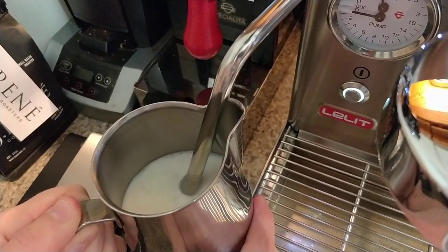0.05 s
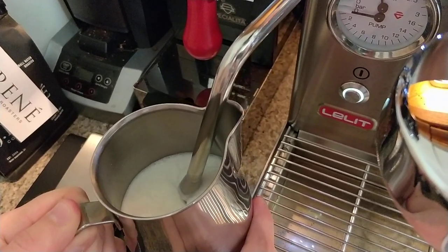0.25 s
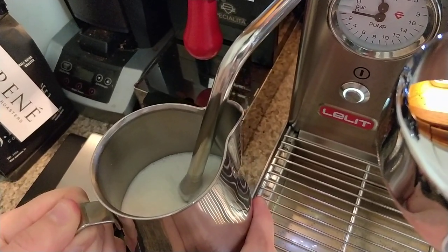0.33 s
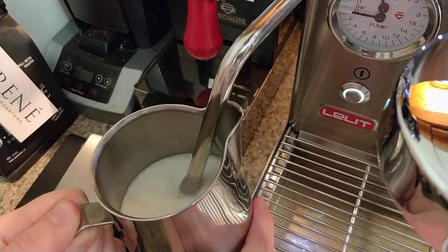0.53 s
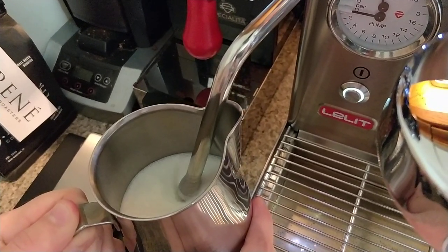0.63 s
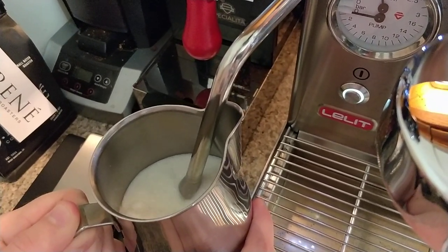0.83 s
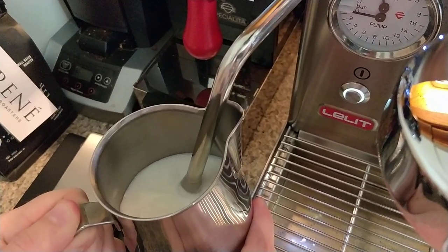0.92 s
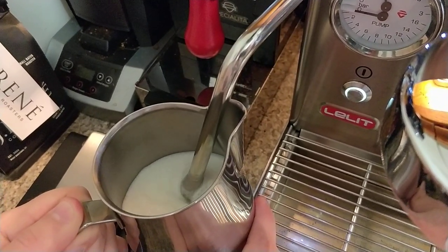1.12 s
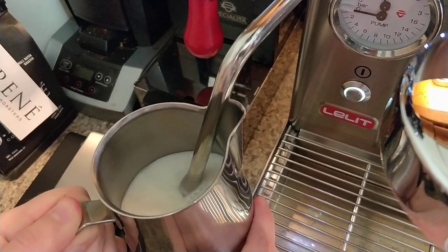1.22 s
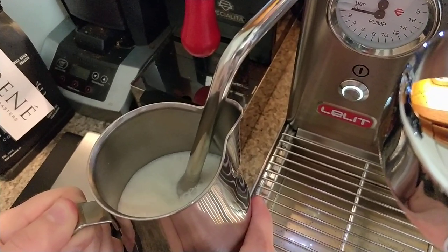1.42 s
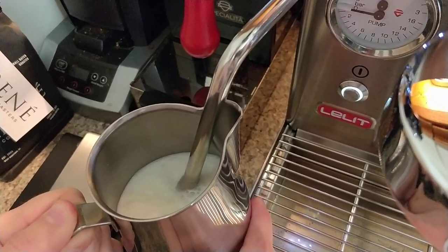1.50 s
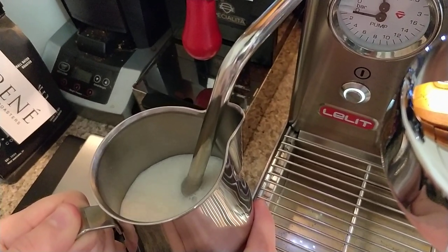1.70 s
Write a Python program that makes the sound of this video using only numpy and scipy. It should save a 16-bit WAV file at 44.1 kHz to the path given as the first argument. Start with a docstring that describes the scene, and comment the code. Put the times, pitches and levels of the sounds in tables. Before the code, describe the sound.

A steam wand froths milk in a metal pitcher, heard up close in a kitchen. It fizzes and churns, tearing in gulps of air with shrill chirps, then bubbles and gurgles more, over a faint machine hum.

```python
"""Steam wand frothing milk

In a steel pitcher on a kitchen counter, the buried jet fizzes and churns as steam bubbles collapse.
When the tip breaks the surface it tears in a gulp of air, often with a shrill chirp. Jet and gulps
ring in the pitcher's air column; bubbles plop, the milk gurgles and the machine hums underneath."""
import sys
import numpy as np
from scipy import signal
from scipy.fft import rfft, irfft
from scipy.io import wavfile
from scipy.ndimage import uniform_filter1d

SR = 44100
rng = np.random.default_rng(int(sys.argv[2]) if len(sys.argv) > 2 else 0)


def wav_record(signal):
    """Record a signal, one row per channel, as 16-bit PCM in the file named by sys.argv[1]."""
    frames = np.transpose(np.atleast_2d(signal))
    bounded = np.clip(frames, -1, 1)
    # unit amplitude maps onto the largest positive 16-bit level
    quanta = np.round(bounded * 32767).astype(np.int16)
    wavfile.write(sys.argv[1], SR, quanta)


N = 77175
T = np.arange(N) / SR


def from_db(db):
    """Decibels to gain."""
    return 10 ** (np.asarray(db) / 20)


def rms(x):
    """Root mean square."""
    return np.sqrt(np.mean(x ** 2) + 1e-20)


def colour(x, outline):
    """Shape a spectrum by an (Hz, dB) outline; rms 1."""
    hz, db = np.transpose(outline)
    bin_hz = np.maximum(np.arange(N // 2 + 1) * SR / N, 1)
    y = irfft(rfft(x) * from_db(np.interp(np.log(bin_hz), np.log(hz), db)), N)
    return y / rms(y)


def low_pass(x, hz):
    """Second-order low-pass."""
    return signal.sosfilt(signal.butter(2, hz, fs=SR, output="sos"), x + 1e-18)


def drift(hz):
    """Smooth random wander; rms 1."""
    y = low_pass(rng.standard_normal(2 * N), hz)[N:]
    return y / rms(y)


def grains(per_s, spread_db):
    """Random clicks of uneven size."""
    sizes = from_db(spread_db * np.minimum(rng.exponential(1, N), 4))
    return sizes * rng.choice([-1, 1], N) * (rng.random(N) < per_s / SR)


def envelope(start_s, length_s, attack_s, release_s):
    """Linear attack; exponential release once the length is over."""
    rise = np.clip((T - start_s) / attack_s, 0, 1)
    return rise * np.exp(-np.maximum(T - start_s - length_s, 0) / release_s)


def steady(x, window_s=0.0091):
    """Even out the chance swells of a noise; rms about 1."""
    return x / np.sqrt(uniform_filter1d(x * x, size=int(window_s * SR)) + 1e-12)


# Air resonances. Each row: frequency in Hz, width in Hz, gain in dB.
AIR_MODES = [(256.6, 218, -17), (576, 132, -20.5), (994.3, 96.3, -6.5), (1229, 178, -20.5),
             (1767, 28, -29.5), (2360, 73, -25.5), (2382, 62, -16), (2817, 111, -12.5), (3023, 110, -15.5),
             (3383, 121, -12.5), (3682, 97, -9.5), (4245, 83, -4.5), (4367, 67, -1), (4701, 134, -1),
             (4765, 63, 4), (5047, 210, -5), (5324, 160, -2), (5479, 147, 5), (5850, 153, -17),
             (6230, 114, -18.5), (6940, 167, -7), (6953, 76, -7.5), (7286, 81, -5), (7680, 130, -12.5),
             (7976, 420, -23.5)]
# Cancellations at the pitcher's mouth. Each row: frequency in Hz, width in Hz.
MOUTH_NULLS = [(388, 29), (2010, 150), (3970, 45), (5085, 35)]


def pitcher(x):
    """The air column: parallel resonances of alternating sign, then the nulls."""
    out = 0
    for k, (hz, width_hz, db) in enumerate(AIR_MODES):
        radius = np.exp(-np.pi * width_hz / SR)
        poles = [1, -2 * radius * np.cos(2 * np.pi * hz / SR), radius ** 2]
        ring = (1 - radius ** 2) / 2 * signal.lfilter([1, 0, -1], poles, x + 1e-18)
        out += (-1) ** k * from_db(db) * ring
    for hz, width_hz in MOUTH_NULLS:
        out = signal.lfilter(*signal.iirnotch(hz, hz / width_hz, fs=SR), out)
    return out


def in_pitcher(source, gain):
    """Ring a source in the pitcher; gain sets the output rms."""
    return pitcher(source * gain) / rms(pitcher(source))


# Course of the jet. Each row: time in seconds, then fizz, froth and churn levels in dB.
JET_LEVELS = [(0, -46.5, -58, -53.5), (.15, -43.5, -54, -55), (.30, -42, -75.5, -51),
              (.53, -45, -55, -57.5), (.80, -40, -74.5, -50.5), (0.879, -46.5, -50, -50.5),
              (.95, -50, -48.5, -46.5), (1.02, -48.5, -85, -45), (1.08, -44.5, -83, -45.5),
              (1.12, -47, -48, -35.5), (1.21, -41.5, -41.5, -45), (1.261, -39.5, -32.5, -50),
              (1.319, -39.5, -42.5, -40), (1.40, -61, -37, -38.5), (1.489, -41.5, -41, -44.5),
              (1.56, -45, -45, -48), (1.64, -48.5, -47.5, -46.5), (1.75, -58, -50, -44.5)]
# Brief swells of the fizz. Each row: start in seconds, length in seconds, level in dB.
SIZZLES = [(.114, 0.0072, -35), (.160, 0.0065, -35.5), (.206, 0.012, -35), (.283, 0.024, -55),
           (.783, 0.0019, -30), (1.285, 0.013, -34.5), (1.340, 0.004, -29), (1.404, 0.0039, -31),
           (1.491, 0.011, -41.5), (1.532, 0.02, -52)]
# Spectra ahead of the pitcher. Each row: frequency in Hz, relative level in dB.
FIZZ_SPECTRUM = [(200, -9.5), (1000, -13), (2000, 8), (2500, 0), (3500, 2.5), (4400, 2.5), (4900, -1),
                 (5500, -3.5), (7000, -2.5), (7700, -7.5), (8300, -24.5)]
FROTH_SPECTRUM = [(200, -35), (1000, -3), (1800, 3), (2800, 10), (3400, 5), (4300, 2), (5500, -23.5),
                  (8300, -29.5)]
CHURN_SPECTRUM = [(50, -10), (110, 10.5), (190, 0), (270, -11), (570, 3), (850, 2), (1020, -1),
                  (1250, -2.5), (1800, 2), (2500, -10), (5000, -23)]


def jet():
    """Collapsing steam bubbles: fine fizz, coarser froth and the low churning of the milk."""
    times_s, *levels_db = np.transpose(JET_LEVELS)
    fizz_db, froth_db, churn_db = [np.interp(T, times_s, db) for db in levels_db]
    sizzle_power = sum((from_db(db) * envelope(start_s, length_s, attack_s=0.0019, release_s=0.0012)) ** 2
                       for start_s, length_s, db in SIZZLES)
    fizz_gain = np.hypot(from_db(fizz_db + 1.6 * drift(hz=38)), np.sqrt(sizzle_power))
    fizz = colour(grains(per_s=6500, spread_db=5), FIZZ_SPECTRUM)
    froth = colour(grains(per_s=1700, spread_db=4.5), FROTH_SPECTRUM)
    froth_gain = from_db(froth_db + 2.0 * drift(hz=39))
    churn = colour(grains(per_s=900, spread_db=2.5), CHURN_SPECTRUM)
    churn_gain = from_db(churn_db + 0.71 * drift(hz=29))
    return in_pitcher(fizz, fizz_gain) + in_pitcher(froth, froth_gain) + in_pitcher(churn, churn_gain)


# Mains hum partials. Each row: frequency in Hz, level in dB.
HUM_PARTIALS = [(59.3, -55), (118.6, -72)]
RUMBLE_SPECTRUM = [(15, 2.5), (35, -5), (75, -23), (108, -1), (170, -15.5), (300, -18), (1000, -33),
                   (8000, -62)]  # Each row: frequency in Hz, relative level in dB.


def machine(waver_db=0.5, rumble_db=-55.5):
    """A wavering mains hum and a low rumble."""
    hum = sum(np.sqrt(2) * from_db(db) * np.sin(2 * np.pi * (hz * T + rng.random()))
              for hz, db in HUM_PARTIALS)
    waver = from_db(waver_db * drift(hz=10))
    rumble = colour(rng.standard_normal(N), RUMBLE_SPECTRUM)
    return hum * waver + from_db(rumble_db) * rumble


def small_bubbles(per_s=55, centre_hz=1020, log_scatter=0.096, over_churn_db=1.5, spread_db=1.5):
    """Random bursts whose level follows the churning, as rows of (time in s, peak in dB, pitch in Hz)."""
    jet_s, _, _, churn_db = np.transpose(JET_LEVELS)
    times_s = np.cumsum(rng.uniform(0.2, 1.8, size=200)) / per_s
    level_draw, pitch_draw = rng.standard_normal((200, 2)).T
    peaks_db = np.interp(times_s, jet_s, churn_db) + over_churn_db + spread_db * level_draw
    pitches_hz = centre_hz * np.exp(log_scatter * pitch_draw)
    return [row for row in zip(times_s, peaks_db, pitches_hz) if row[0] < T[-1]]


# Large bubbles bursting. Each row: start in seconds, peak level in dB, pitch in Hz.
LARGE_BUBBLES = [(0.24, -32.5, 957), (.321, -26.5, 1031), (0.4, -34.5, 932), (.406, -36, 948),
                 (.644, -23, 973), (0.658, -19.5, 984), (0.729, -23, 998), (.896, -34.5, 1064),
                 (.983, -37, 1000), (1.106, -26, 1050), (1.174, -31, 1066), (1.193, -27.5, 1050),
                 (1.277, -22, 1020), (1.286, -29.5, 1022), (1.310, -35.5, 990), (1.332, -24.5, 998),
                 (1.363, -27, 1160), (1.384, -32.5, 1120), (1.454, -26.5, 1004), (1.527, -29.5, 1070),
                 (1.597, -31.5, 1090), (1.674, -40, 1100)]


def plops(rise_s=0.002, thud_db=-22.5):
    """Each bursting bubble swells and dies near the pitcher's hollow note, over a dull thud."""
    thud = low_pass(rng.standard_normal(N), hz=615)
    thud *= from_db(thud_db) / rms(thud)
    out = np.zeros(N)
    for start_s, db, hz in list(LARGE_BUBBLES) + small_bubbles():
        first = int(start_s * SR)
        span = slice(first, first + SR // 20)
        age_s = np.maximum(T[span] - start_s, 0)
        swell = age_s / rise_s * np.exp(1 - age_s / rise_s)
        out[span] += from_db(db) * swell * (np.sin(2 * np.pi * hz * age_s) + thud[span])
    return out


# Gulps of air. Each row: start, length and attack in seconds, treble level in dB, bass weight in dB.
GULPS = [(0.236, 0.023, 0.0056, -28, -0.5), (0.316, 0.016, 0.0082, -28.5, 1.5),
         (0.354, .014, 0.0095, -32.5, -3.5), (0.37, 0.041, .011, -31, -3.5),
         (0.444, 0.016, 0.014, -39.5, -19), (0.557, 0.033, 0.0058, -31.5, -2),
         (0.57, 0.034, 0.0075, -34.5, 3), (0.627, 0.042, 0.018, -23, 4.5), (.656, 0.025, 0.0087, -21, 3),
         (0.682, 0.024, .004, -22.5, 1.5), (0.707, 0.011, 0.0045, -17.5, -1.5),
         (.720, 0.018, 0.0023, -26, 4.5), (0.741, 0.015, 0.0036, -31, 0), (0.759, 0.019, .003, -43.5, -4.5),
         (1.045, 0.0067, 0.0069, -32.5, 3.5), (1.089, .026, 0.016, -26, -9),
         (1.120, .015, .003, -29.5, 0.5), (1.148, 0.011, 0.0031, -23, -9), (1.16, 0.03, .003, -34.5, -3),
         (1.375, 0.0082, 0.0059, -24, -4.5), (1.384, 0.034, 0.0025, -32.5, -0.5),
         (1.420, 0.024, 0.011, -34.5, 2.5)]
# Spectrum ahead of the pitcher. Each row: frequency in Hz, relative level in dB.
GULP_SPECTRUM = [(50, -23.5), (130, 2), (250, -10), (570, -3.5), (900, 2.5), (1020, 1), (1200, 1.5),
                 (2500, -0.5), (4500, -0.5), (5500, -3), (7300, 5), (8500, 0.5)]


def gulps(crossover_hz=3000, flutter_db=1.52):
    """Air torn in at the surface: fluttering rushes of noise that ring in the pitcher."""
    rush = pitcher(colour(rng.standard_normal(N), GULP_SPECTRUM))
    rush /= rms(rush)
    bass = signal.sosfiltfilt(signal.butter(2, crossover_hz, fs=SR, output="sos"), rush)
    treble_power = bass_power = 0
    for start_s, length_s, attack_s, db, bass_db in GULPS:
        gain = from_db(db) * envelope(start_s, length_s, attack_s, release_s=0.0064)
        treble_power += gain ** 2
        bass_power += (gain * from_db(bass_db)) ** 2
    highs = steady(rush - bass) * np.sqrt(treble_power)
    lows = rms(bass) * steady(bass) * np.sqrt(bass_power)
    return (highs + lows) * from_db(flutter_db * drift(hz=168))


# Gurgles of the rolling milk. Each row: start and length in seconds, level in dB, pitch in Hz.
GURGLES = [(0.242, 0.014, -38, 271), (0.325, 0.0088, -44, 270), (0.571, 0.027, -48.5, 245),
           (0.651, 0.063, -44.5, 260), (0.693, 0.063, -46, 122.5), (0.927, 0.0077, -47.5, 234),
           (0.977, 0.0057, -40, 220), (0.989, 0.031, -48.5, 115), (1.050, 0.0048, -40.5, 250),
           (1.22, 0.017, -47, 130), (1.274, .025, -45.5, 127), (1.598, 0.033, -46.5, 112),
           (1.71, 0.026, -49.5, 121)]
# Spectrum of one gurgle. Each row: multiple of the pitch, relative level in dB.
GURGLE_SPECTRUM = [(.45, -29.5), (.75, -11), (1, 9.5), (1.2, -4.5), (1.55, -15.5), (2.25, -2), (3, -22),
                   (8, -41.5)]


def gurgles():
    """Pockets of steam heave the milk with short low burbles, each at its own pitch."""
    out = 0
    for start_s, length_s, db, hz in GURGLES:
        outline = [(multiple * hz, level_db) for multiple, level_db in GURGLE_SPECTRUM]
        burble = steady(colour(rng.standard_normal(N), outline))
        out += from_db(db) * burble * envelope(start_s, length_s, attack_s=0.0094, release_s=0.0037)
    return out


# Chirps at the tip. Each row: start and length in seconds, level in dB, pitch in Hz.
CHIRPS = [(0.258, 0.0066, -24, 5420), (0.321, 0.0057, -19, 5440), (0.3308, .0045, -17.5, 5400),
          (0.564, 0.036, -33, 5500), (0.659, 0.012, -20.5, 5480), (0.685, 0.014, -26.5, 5490),
          (0.698, 0.0064, -18.5, 4150), (0.709, 0.0098, -15.5, 4893), (0.719, 0.0028, -31, 5490),
          (1.097, 0.021, -28, 5480), (1.146, 0.0094, -21.5, 5490), (1.158, 0.0048, -29, 5530)]


def chirps(waver_hz=55.6):
    """Air squeezed past the tip locks briefly into a whistle, mostly on the strongest resonance."""
    detune_hz = waver_hz * drift(hz=381)
    out = 0
    for start_s, length_s, db, hz in CHIRPS:
        whistle = np.sqrt(2) * np.sin(2 * np.pi * np.cumsum(hz + detune_hz) / SR)
        out += from_db(db) * whistle * envelope(start_s, length_s, attack_s=0.0044, release_s=0.0029)
    return out


# Reflections off the machine's front and the counter. Each row: delay in seconds, gain in dB.
REFLECTIONS = [(.00381, -17), (.00673, -20), (.00873, -23)]


def kitchen(x, t60_s=0.13, tail_db=-10.5, predelay_s=0.005):
    """A few near reflections and a short diffuse tail from the walls."""
    near = sum(from_db(db) * np.interp(T - delay_s, T, x, left=0) for delay_s, db in REFLECTIONS)
    tail = rng.standard_normal(N) * from_db(-60 * T / t60_s) * (T > predelay_s)
    tail /= np.sqrt(np.sum(tail ** 2))
    return near + from_db(tail_db) * signal.fftconvolve(x, tail)[:N]


def scene():
    """The pitcher close by, the kitchen around it, the machine underneath; mono."""
    milk = jet() + gulps() + chirps() + plops() + gurgles()
    return (milk + kitchen(milk) + machine())[None]


def record(dry):
    """Steep treble cut."""
    cutoff_hz = 8400
    return signal.sosfilt(signal.ellip(10, 0.3, 75, cutoff_hz, fs=SR, output="sos"), dry)


dry = scene()
out = record(dry)
wav_record(out)
```